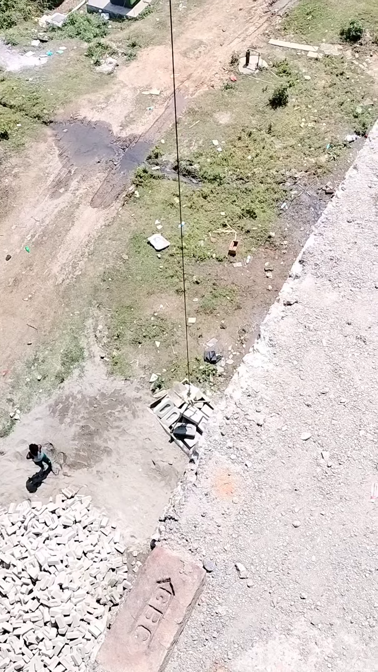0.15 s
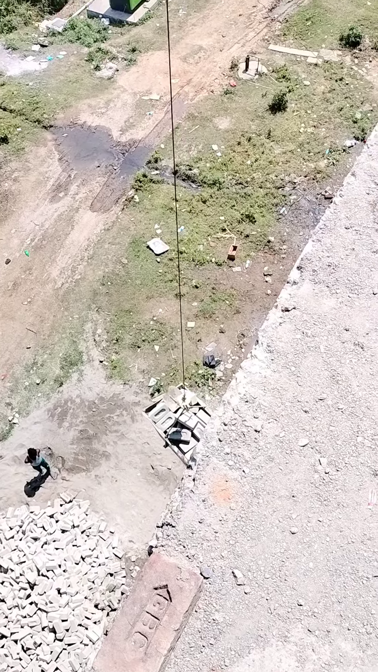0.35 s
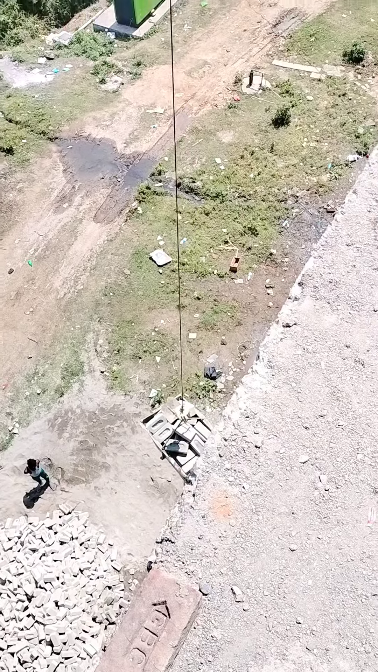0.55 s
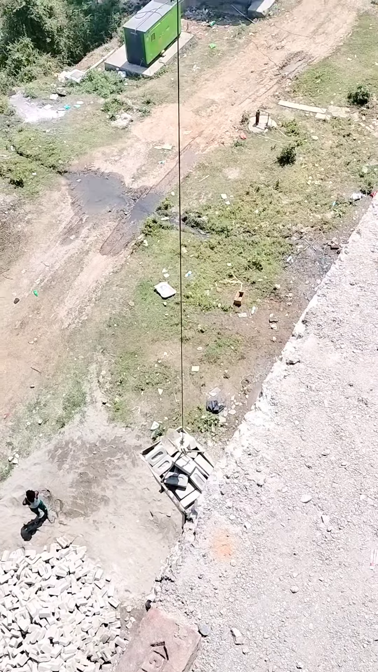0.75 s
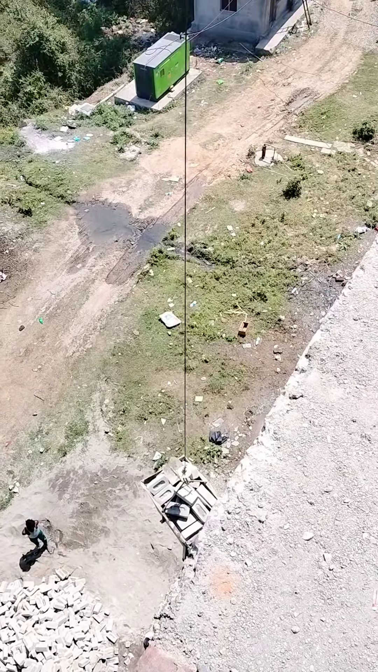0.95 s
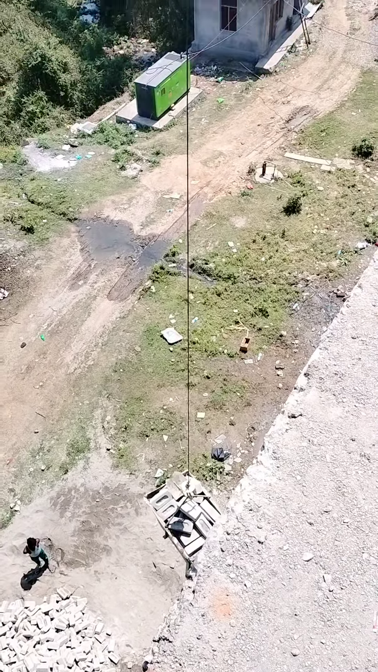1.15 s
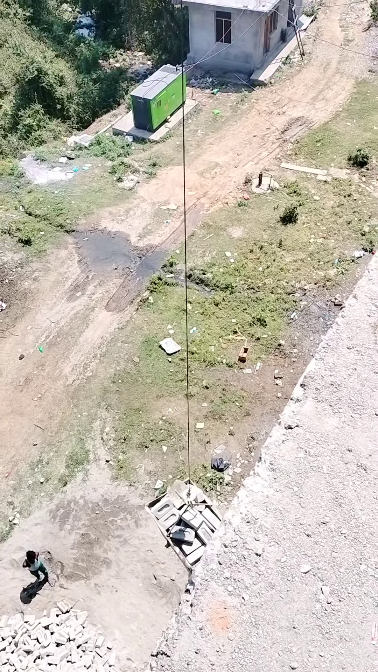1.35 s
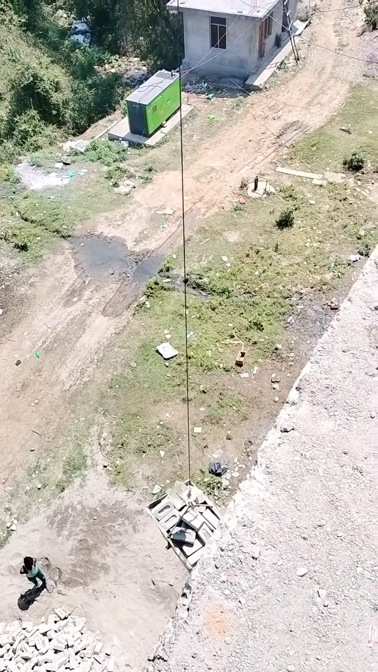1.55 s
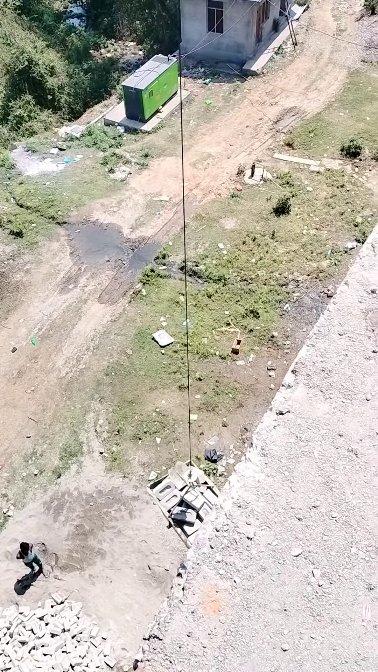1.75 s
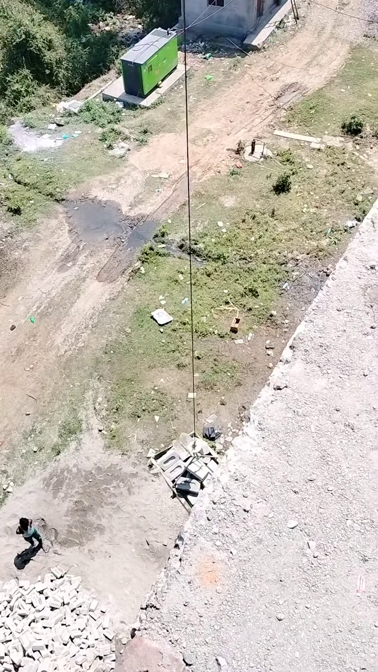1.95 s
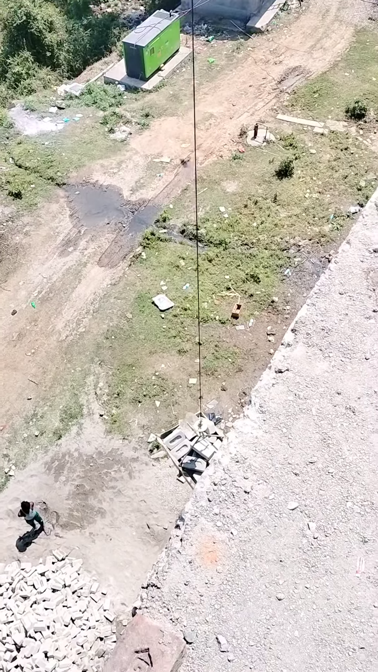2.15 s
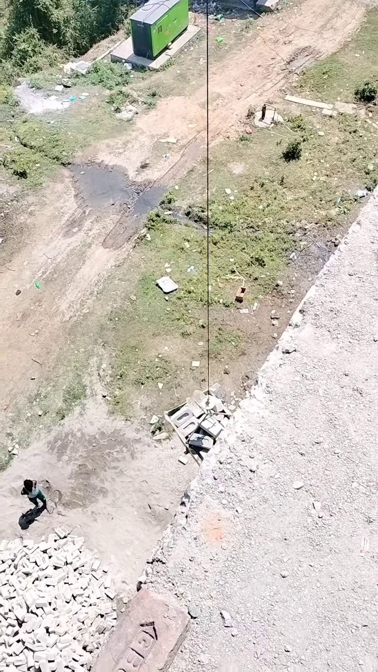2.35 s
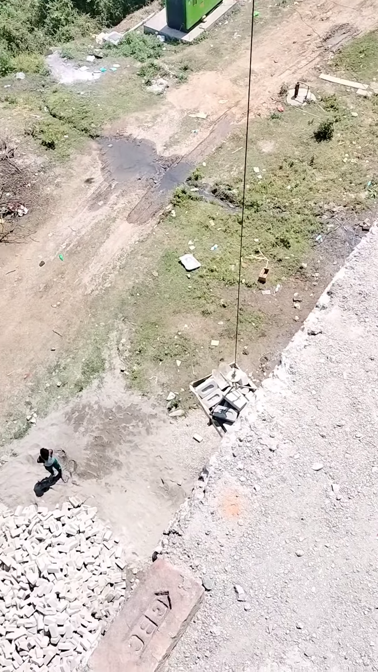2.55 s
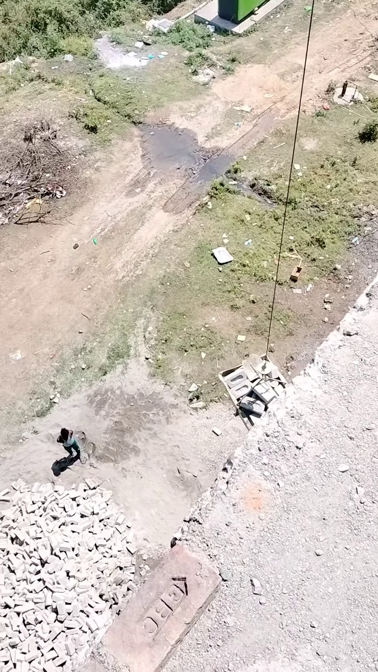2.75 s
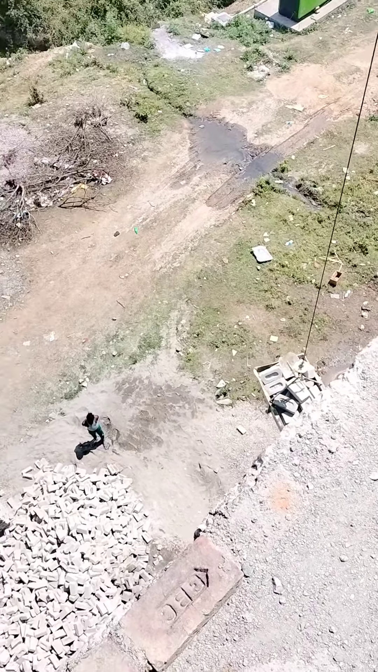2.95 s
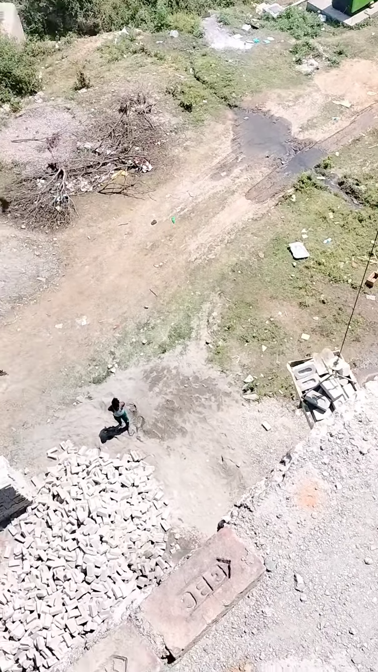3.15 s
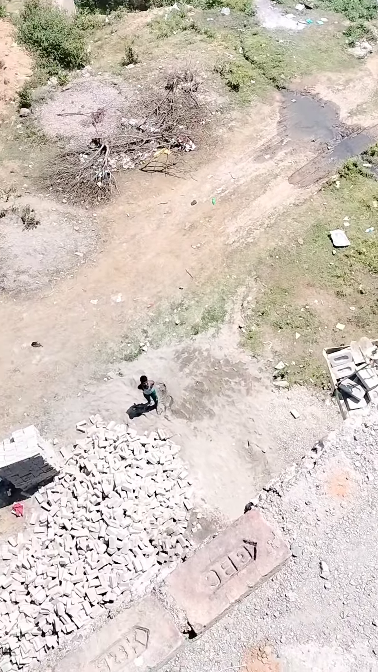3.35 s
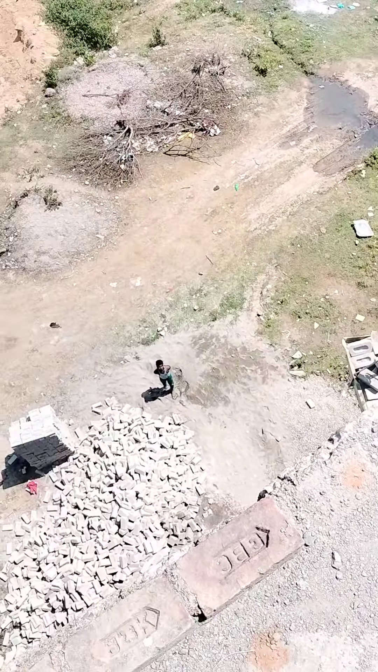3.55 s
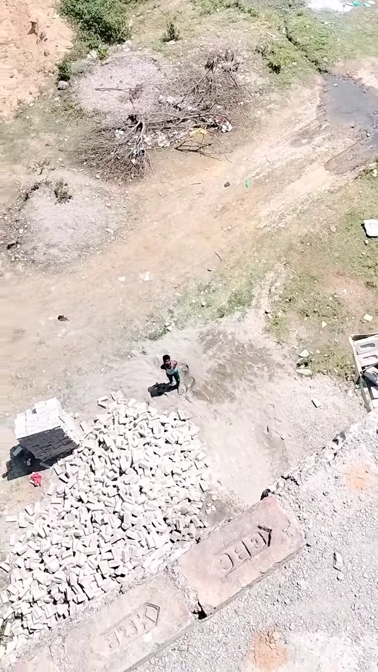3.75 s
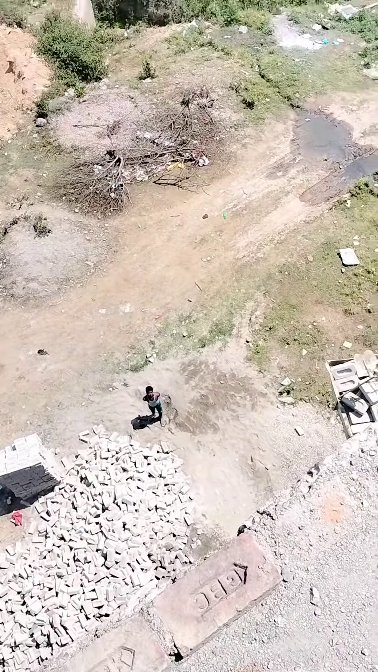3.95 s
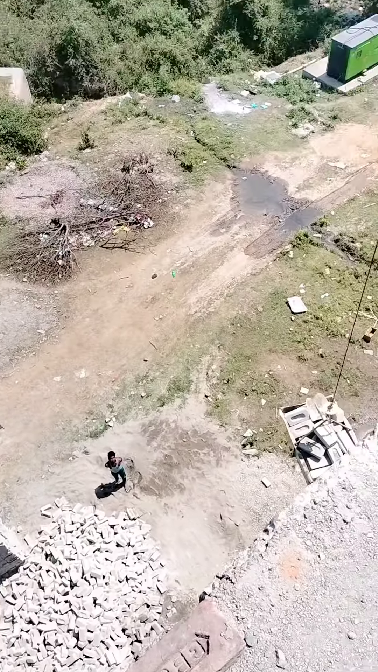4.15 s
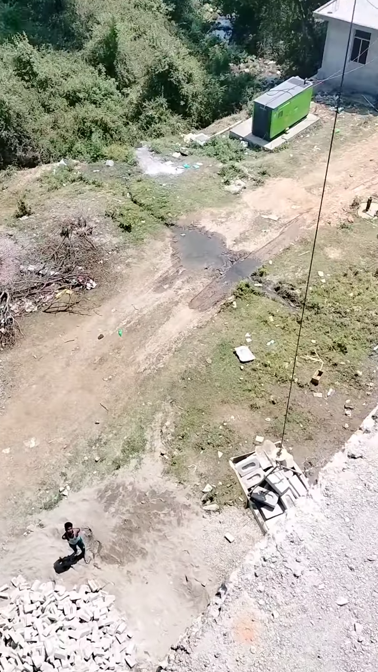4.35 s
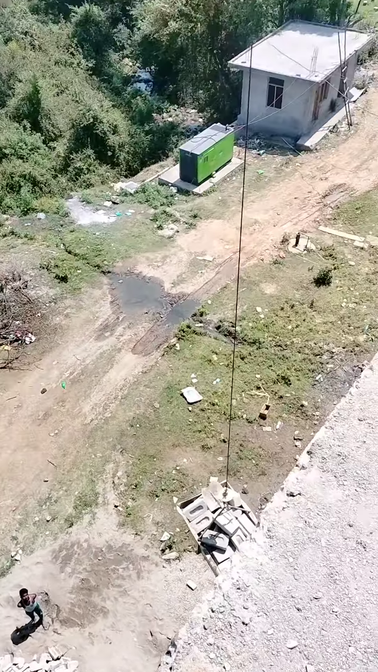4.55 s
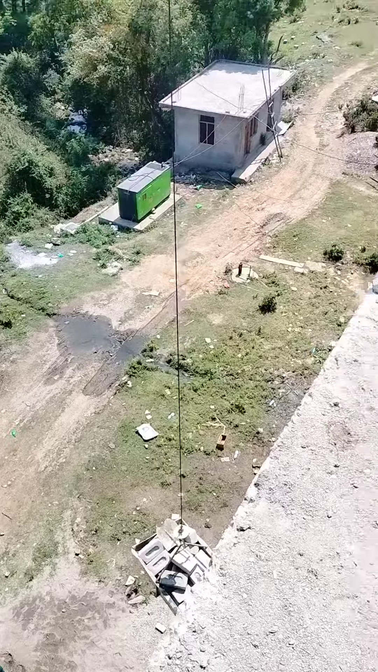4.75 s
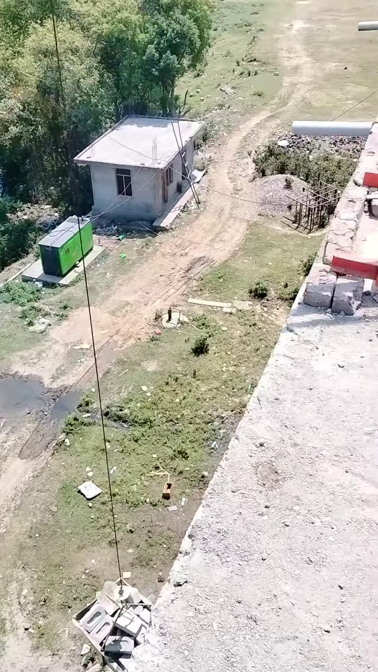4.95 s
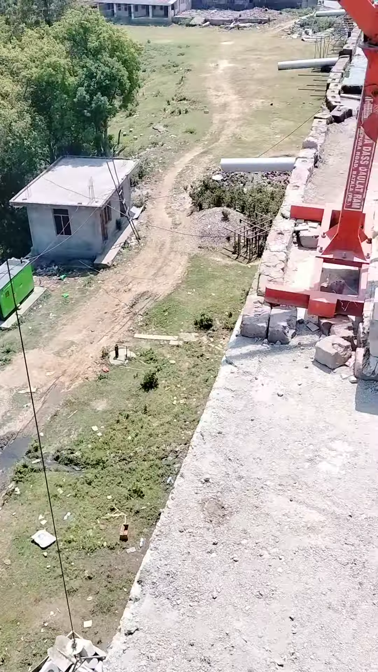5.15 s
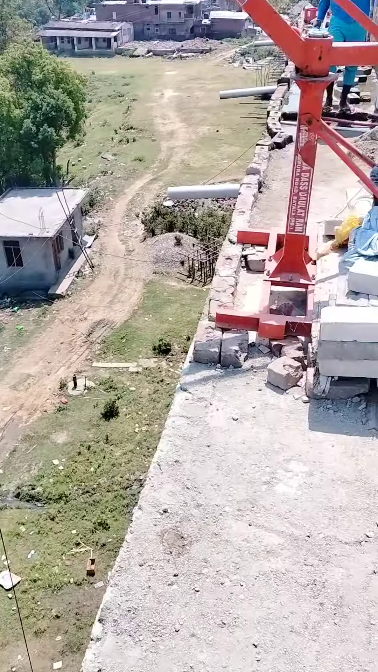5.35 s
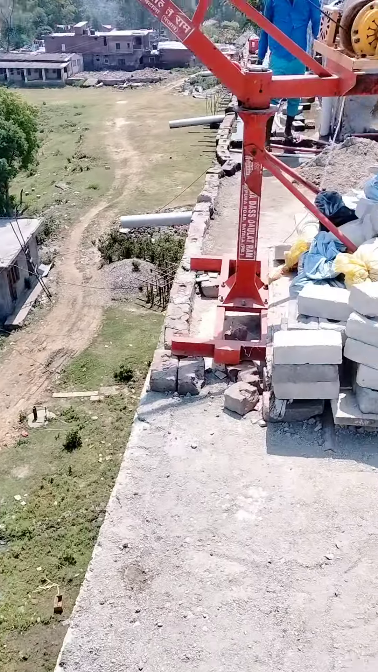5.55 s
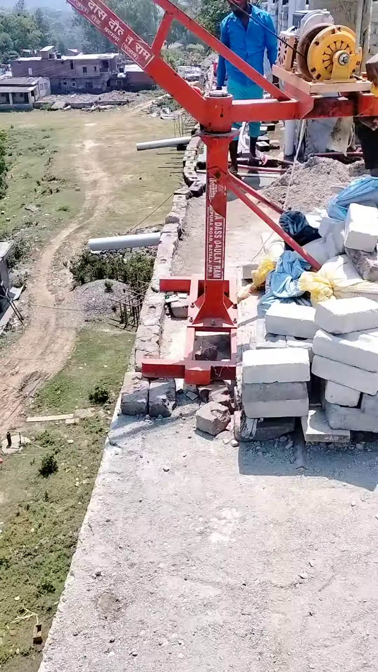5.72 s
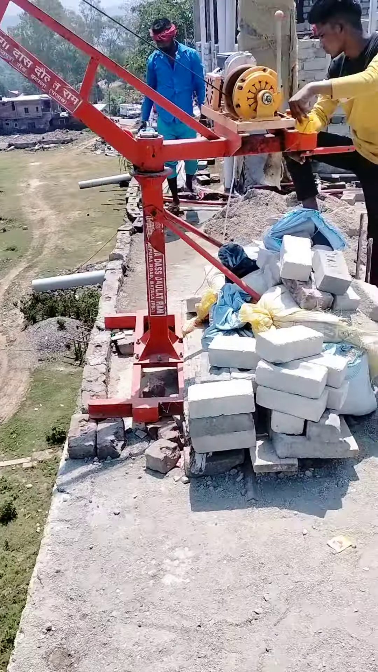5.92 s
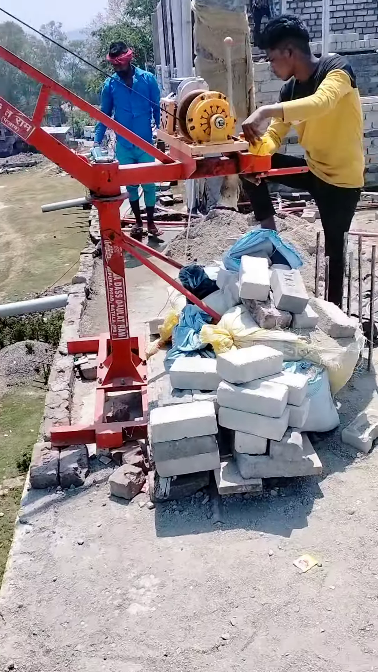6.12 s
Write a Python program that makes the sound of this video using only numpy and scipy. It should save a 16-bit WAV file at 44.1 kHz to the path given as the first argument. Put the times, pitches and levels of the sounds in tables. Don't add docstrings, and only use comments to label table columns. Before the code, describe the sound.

A small electric winch whines and grinds steadily with a throbbing gear pulse, while wind thumps the microphone and stones crunch underfoot near the end.

```python
import sys
import numpy as np
from scipy import signal
from scipy.fft import rfft, irfft, next_fast_len
from scipy.io import wavfile
from scipy.ndimage import uniform_filter1d

SR = 44100
rng = np.random.default_rng(int(sys.argv[2]) if len(sys.argv) > 2 else 0)


def log_audio(samples):
    frames = np.atleast_2d(samples).T
    limited = np.clip(frames, -1, 1)
    pcm = np.round(limited * 32767).astype(np.int16)
    wavfile.write(sys.argv[1], SR, pcm)


def volts_from_db(level):
    exponent = np.asarray(level, float) / 20
    return 10 ** exponent


N = 277124

START_S, FADE_IN_S = .2866, .0006
PINION_TEETH, WHEEL_TEETH, WHEEL_TURN_AT_1S = 7, 83, .049
# time in seconds, shaft turns per second.
SHAFT_SPEED = [(0.28, 48.054), (0.9, 48.006), (1.5, 48.155), (2.1, 48.093), (2.7, 48.004), (3.3, 48.109),
               (3.9, 48.057), (4.5, 48.021), (5.1, 48.017), (5.7, 48.045), (6.28, 48.017)]
RUNOUT = [(0, 0.26, 0.7), (.09, -0.89, 0.39), (.17, -0.93, 1.1), (.26, -0.74, 0.43), (.33, 0.36, 0.59),
          (.42, 0.57, 1.4), (.5, 0.36, 1), (.62, 0.8, 0.92), (.76, 1.1, .85), (.88, 0.64, 1.13),
          (1, 0.26, 0.7)]
OVERTONES = [(0, 0, .4, 3.1, .3, 3.1, .3, 0), (.05, -.4, .6, 2.6, .6, .5, .6, -.8),
             (.15, -1, 1, 2.4, 1.8, -.3, 1.4, -.9), (.25, -.9, .8, 2.7, .7, -1.2, .3, -3.3),
             (.35, -.1, .4, 3.3, .9, -1.1, .5, -3), (.45, .8, .2, -.2, .5, -1.8, .4, -2.7),
             (.55, .9, .7, .6, 1.3, -2.5, .9, -3.6), (.65, 1.4, 1.3, .8, .9, -3, .8, -3.3),
             (.75, 1.7, 2.1, 1.1, .6, -2.6, 1.6, -2.8), (.8, 1.7, 1.6, 1, .7, -1.9, 2.3, -3.2),
             (.9, .9, .7, -.6, 1.3, -2.1, .5, -3.1), (.95, .4, .4, -1.7, 1, -2.5, .6, -1.3),
             (1, 0, .4, -3.18, .3, -3.18, .3, 0)]
MESH_DB = [
    [-39.5],
    [-40.5],
]
SECOND_LEAD = (-1.65, 1.5)
# level in dB, swell in dB, loudest at share of the 83-turn cycle, share of the third's
# left-right sway, dB gained facing the winch, lag of the sway in seconds.
SECOND_LEVEL = (-42, 4, 0.3, 1.1, 2.5, -2)
# time in seconds, left dB, right dB, rad the left leads by.
THIRD = [(0.28, -28, -28, 2.25), (0.6, -26.5, -29.5, 3.25), (0.9, -27.5, -27, 4.17),
         (1.5, -27.5, -28.5, 2.63), (1.8, -29.5, -23, 3.06), (2.1, -31.5, -25.5, 2.8),
         (2.4, -29.5, -32, 3.8), (3.0, -33, -32.5, 4.3), (3.3, -27, -33.0, 4.55), (3.6, -33, -30, 4.37),
         (3.9, -29, -31.5, 4.4), (4.2, -32.5, -30, 3.88), (4.8, -36.5, -27, 4.7), (5.1, -27, -24, 5.7),
         (5.4, -22.5, -23, 6.3), (5.7, -30, -27.5, 5.7), (6.0, -24, -23.5, 7), (6.28, -23.5, -25, 5.6)]
# time in seconds, left dB, right dB.
FOURTH = [(.4, -45, -47.5), (.9, -57, -44.5), (1.15, -38.5, -36), (1.5, -42, -32.5), (1.9, -38, -40),
          (2.2, -55.5, -45), (2.6, -43, -34.5), (2.9, -31, -43.5), (3.2, -32, -38.5), (3.6, -34.5, -47),
          (4.1, -46, -42), (4.5, -47, -34.5), (4.9, -41.5, -30.5), (5.2, -48.5, -41), (5.5, -40.5, -44.5),
          (5.9, -44.5, -48), (6.2, -37, -36.5)]
# start in rad, drift in rad per second, rad gained between swells, first swing in rad,
# settling time in seconds.
FOURTH_LEAD = (.1, .62, 1.9, -7, .45)
SWELL_AT = .8
# time in seconds, left dB, right dB, rad the left leads by.
NINTH = [(.4, -48.5, -47.5, 1.5), (1.1, -46, -48, -0.2), (1.5, -45, -54, 1), (2.2, -49.5, -50, -0.6),
         (2.6, -55.5, -47, -0.2), (3.3, -45, -62, -4), (3.9, -42, -60, -2.5), (4.3, -48.5, -52.5, -3.5),
         (4.7, -51, -49.5, -5.5), (5.2, -44, -54.5, -8), (5.6, -52.5, -51.5, -3.5), (6.2, -43, -48, -4)]
HUM_ORDERS = [2, 8, 15, 16, 18, 19, 24.22, 23.66, 17.65]
# left dB, right dB.
HUM_DB = [(-53.5, -54), (-39, -41), (-53, -52), (-52, -46), (-52, -54.5), (-66, -58), (-64.5, -63),
          (-58.5, -54.5), (-57.5, -56.5)]
SIDE_ORDERS = [20, 22, 23, 25]
SIDE_DB = [-47, -45, -47, -56]
HIGH_ORDERS = [27, 32, 35, 41, 42, 56, 84, 70, 72, 147]
# dB against the grind, share that throbs with the tooth force, left over right in dB.
HIGH = [(-14, .3, .1), (-23, .54, 0.9), (-13.5, 0.37, 0.8), (-18.5, 0.28, -1.4), (-17.5, 0.91, -2.5),
        (-16, .64, 2), (-20, 0.84, 0.3), (-18.5, 0.54, 2.5), (-16.5, 0.3, 3), (-44, .2, -0.5)]
# middle in seconds, length in seconds, level in dB.
BOOM = [
    (1.1, 2.6, -44.5),
    (2.65, 1, -41),
    (3.42, 0.44, -41.5),
    (4.6, 1.3, -39),
    (5.8, 1.1, -37),
]
BOOM_HZ = 229.4
# pitch in Hz, level in dB per Hz.
CASE = [(40, -14), (230, 5.5), (500, 3.5), (680, 6), (820, 1.5), (1020, 14.5), (1250, 6), (1600, -1),
        (3300, -3), (4500, -10), (5900, -19), (6500, -28.5), (7200, -29.5), (8600, -51)]
DIP_DB = -1
GRIND_DB = [
    [-38.6],
    [-37.5],
]
# pitch in Hz, how far the grind follows the tooth force.
THROB = [(400, 0.087), (1500, 0.67), (3000, 1.2), (6000, 1.3)]
# pitch in Hz, likeness of the two microphones from 0 to 1.
ALIKE = [(100, 0.38), (330, 1), (1000, 0.26), (3000, 0.43), (6000, 0.12)]
# pitch in Hz, rad the left leads by.
LEAD_AWAY = [(0, 6.5), (520, -1.55), (950, -1), (3010, -7), (3360, -9.5), (5430, -11.5), (6030, -16),
             (6800, -8)]
# pitch in Hz, rad the left leads by.
LEAD_FACING = [(0, 5.5), (1030, -2), (2670, -2.5), (3360, -2), (4820, -4), (6030, -18), (6550, -11),
               (6800, -3)]
# time in seconds, facing the winch from 0 to 1, gain from coming closer in dB.
TURN = [(0, 0.2, -1.5), (1, 0.24, 0.3), (1.6, 0.27, 2), (2.2, 0.19, -0.14), (4.5, 0.26, 0.7),
        (5.3, 0.6, 2.5), (5.9, .8, 5.5), (6.3, 1., 2.5)]
NEAR_SHARE = [
    [1.1],
    [0.28],
]
# pitch in Hz, change in dB.
HAND_SHADE = [(300, 0), (2500, 1), (4400, -2), (6700, -3)]
# middle in seconds, length in seconds, strength in dB.
GRIP = [
    (3.3, 2, 1.7),
]
# pitch in Hz, change in dB.
CUP = [(1200, 1.3), (1750, 3), (2300, -1.3), (3300, 0.9), (5000, -5)]
SHADE_DB, SHADE_HZ = -11, 555
# pitch in Hz, level in dB per Hz.
WIND_COLOUR = [(15, -39.5), (40, -10), (90, -6), (190, -3), (270, -11.5), (420, -16), (700, -42),
               (1200, -66.5)]
CALM_DB = [
    [-48],
    [-48],
]
# middle in seconds, length in seconds, level in dB, microphone (0 left, 1 right).
GUSTS = [(0.383, 0.2, -26.5, 0), (.48, .25, -33, 1), (0.767, .2, -22, 0), (.72, .14, -29.5, 1),
         (.85, .08, -25, 0), (0.902, .22, -29, 1), (1.0, 0.21, -28, 0), (1.06, .1, -32, 1),
         (1.2, .1, -31, 1), (1.22, 0.36, -34, 0), (1.365, 0.14, -35, 1), (1.43, .12, -23.5, 0),
         (1.57, 0.16, -28, 0), (1.7, 0.087, -36, 1), (1.826, 0.18, -26.5, 0), (2.03, 0.13, -29.5, 0),
         (2.239, 0.15, -28, 0), (2.3, 0.86, -47, 0.93), (2.75, 0.28, -25, 0), (3.5, 1.1, -43, 0),
         (4.02, .23, -27, 1), (4.1, 0.56, -40, 0.021), (4.25, 0.26, -33.5, 1), (4.53, 0.14, -34, 1),
         (4.59, 0.26, -20, 0), (4.76, 0.21, -31.5, 0.0071), (4.938, 0.15, -27, 0),
         (5.102, 0.41, -34.5, 0.033), (5.1, .1, -37, 0.97), (5.6, .8, -44, 0.05)]
# time in seconds, peak in dB, pitch in Hz, microphone (0 left, 1 right),
# direction (1 push, -1 pull).
THUMPS = [(.394, -18, 190, 0, -1.1), (.545, -17, 197, 0, -0.92), (.716, -18, 188, 0.12, -1),
          (.735, -15.5, 175, 0, 1), (.759, -4, 177, 0, -0.93), (.802, -10.5, 170, 0, -1.14),
          (0.819, -14, 165, 0, -1), (.83, -8.5, 205, 0, -1.04), (.928, -17, 200, 1, 0.93),
          (.971, -18, 182, 0.93, -1.1), (1.163, -14.5, 244, 1, 1), (1.267, -16.5, 181, 0.077, -1),
          (1.41, -10.5, 160, 0, -1.06), (1.431, -5.5, 210, 0, -1.1), (1.544, -11, 189, 0, -0.81),
          (1.557, -13, 185, 0, 0.89), (1.615, -15, 134, 0, -0.88), (1.768, -11.5, 192, 0, -1.15),
          (1.783, -17.5, 190, 0, -1), (1.812, -15.5, 190, 0, -0.95), (1.912, -15.5, 196, 0, -1),
          (2.175, -15, 193, 0, 1), (2.196, -18, 190, 0, 0.91), (2.742, -15, 168, 0.078, 0.9),
          (2.767, -14.5, 166, 0, -0.93), (3.968, -18.5, 181, 1, -1), (4.03, -14.5, 166, 1, 0.93),
          (4.074, -17.5, 130, 1, 0.89), (4.13, -19, 190, 1, -0.94), (4.245, -17.5, 146, 1, -0.95),
          (4.312, -15, 136, 1, 0.89), (4.51, -13.5, 203, 0, -0.96), (4.528, -13.5, 182, 0, -0.95),
          (4.557, -8, 213, 0, -1.2), (4.604, -4, 196, 0, 0.91), (4.618, -0.5, 210, 0, -1),
          (4.651, -10, 195, 0, 1), (4.674, -20, 200, 0, -1), (4.808, -9.5, 226, 0.1, 1),
          (4.928, -15, 140, 0, 1)]
# time in seconds, peak in dB, left over right in dB, seconds to fall by 60 dB.
TICKS = [(1.2037, -13.5, -1.5, 0.016), (2.2663, -11.5, -6, 0.017), (2.9024, -19.5, -1.5, 0.028),
         (5.5697, -37, 8, 0.031), (5.6474, -36, -4.5, 0.035), (5.7922, -29, 2.5, 0.021),
         (5.895, -30.5, 8, 0.037), (5.9244, -23, 5.5, 0.027), (5.9942, -32, 1.5, 0.052),
         (6.0312, -15.5, 2, 0.013), (6.1016, -16, 5.5, 0.013)]
KNOCK_S = [1.204, 1.205, 2.35, 5.073, 5.078, 5.79, 5.897, 5.995, 6.108]
# peak in dB, pitch in Hz, width in Hz, seconds to fall by 60 dB.
KNOCKS = [(-20.5, 1300, 300, 0.14), (-21.5, 2500, 510, 0.08), (-24, 1100, 740, 0.049), (-20, 830, 220, 0.1),
          (-18, 270, 330, 0.18), (-24.5, 2000, 570, 0.049), (-17, 1500, 380, 0.071),
          (-17.5, 1200, 900, 0.029), (-21.5, 700, 900, 0.21)]
# pitch in Hz, level in dB per Hz.
SOLE = [(300, -19.5), (550, -2.5), (1500, 4), (2000, -3.5), (2500, -3), (3300, -10), (4700, -9.5),
        (7000, -32), (9000, -55)]
# start in seconds, end in seconds, level in dB.
SCUFFS = [
    (5.788, 5.857, -31),
    (5.897, 5.929, -32.5),
    (5.955, 6.037, -32.5),
    (6.109, 6.11, -38),
]
SCUFF_RISE_DB_PER_S, SCUFF_FALL_DB_PER_S = 259.5, 171
# middle in seconds, length in seconds, pitch in Hz, level in dB.
STONES = [(5.6, .02, 1700, -37), (5.757, 0.0072, 3000, -34), (5.796, 0.013, 2100, -25.5),
          (5.82, .05, 2400, -27), (6.4, .04, 4900, -32.5), (5.85, 0.042, 1900, -36),
          (5.885, .04, 1600, -32.5), (5.918, 0.056, 2550, -24.5), (2.5, 0.07, 3500, -37.5),
          (7.4, .025, 1600, -28.5), (5.973, 0.027, 2600, -28.5), (5.5, 0.079, 4000, -31.5),
          (5.994, 0.023, 1300, -27.5), (4.3, 0.021, 3500, -28.5), (6.04, 0.038, 3200, -26.5),
          (6.04, 0.031, 3900, -30.5), (5.5, .012, 5700, -31), (6.108, 0.034, 2300, -32.5),
          (5.86, .15, 550, -40)]
STONE_WIDTH = .13
# time in seconds, peak in dB, pitch in Hz, left over right in dB.
CRACKS = [(1.2045, -17, 2600, -3.5), (1.2091, -21.5, 2400, -2.5), (1.2145, -23, 1405, -2),
          (2.2682, -27, 5180, 0.5), (5.0745, -14, 788, 0), (5.6, -24, 2025, 3), (5.7558, -22, 2860, 1.5),
          (5.773, -20.5, 2090, 1.5), (5.7876, -21, 2370, 4), (5.7945, -13, 1900, 4.5),
          (5.7957, -12, 2253, 3.5), (5.8091, -15.5, 2475, 5.5), (5.8152, -19.5, 3050, 4),
          (5.8225, -20, 2435, 4), (5.835, -19.5, 2100, 8), (5.845, -23.5, 2464, 1.5),
          (5.8834, -17.5, 1930, 3), (5.9012, -19, 1718, 5.5), (5.9164, -19.5, 3170, 3),
          (5.9277, -15.5, 2480, 4), (5.9538, -21.5, 1935, 4), (5.9615, -16.5, 2430, 3),
          (5.9905, -17.5, 1917, 2), (5.9969, -13, 1760, 4), (6.0305, -18, 3250, 1.5),
          (6.1055, -18, 2400, 0)]
CRACK_CYCLES, CRACK_EDGE_DB = 2.2, -8
# start in seconds, length in seconds, top pitch in Hz, level in dB.
CAWS = [
    (1.671, 0.33, 1883, -41.5),
    (2.48, .29, 1850, -39),
    (3.28, .28, 1960, -37.5),
]
CAW_ARCH, CAW_ROUGH = .14, .7
CAW_BEAT_HZ = 126.7
CAW_BEATS = [-9, -12, -3.5]
# delay in seconds, level in dB.
CAW_ECHOES = [
    (0, 0),
    (.035, -6),
    (.12, -8),
]
GATES_HZ = np.arange(5850, 8700, 170)
KEEP_DB = -87


def evened(x):
    return x / np.sqrt(np.mean(abs(x) ** 2) + 1e-20)


def read(points, hz):
    f, value = np.transpose(points)
    return np.interp(np.log(hz + 1), np.log(f + 1), value)


def play(rows, t=None):
    s, *columns = np.transpose(rows)
    at = np.arange(N) / SR if t is None else t
    return np.array([np.interp(at, s, column) for column in columns])


def add(mix, s, sound):
    part = mix[..., round(s * SR):][..., :sound.shape[-1]]
    part += sound[..., :part.shape[-1]]


def colour(x, points):
    size = next_fast_len(N, True)
    gain = volts_from_db(read(points, np.fft.rfftfreq(size, 1 / SR)))
    return evened(irfft(rfft(x, size) * gain, size)[..., :N])


def flutter(width_hz):
    keep = np.exp(-np.pi * width_hz * 32 / SR)
    step = np.arange(N // 32 + 2) * 32
    a, b = signal.lfilter([1], [1, -keep], rng.standard_normal((2, len(step))))
    return np.interp(np.arange(N), step, evened(a + 1j * b))


def steadied(x):
    return x / np.sqrt(abs(uniform_filter1d(x ** 2, size=SR // 10)) + 1e-6)


def swells(rows, t=None):
    step = np.arange(0, N + 128, 128) / SR
    power = sum(volts_from_db(2 * db) * np.exp(-8 * ((step - s) / length) ** 2) for s, length, db in rows)
    return np.interp(np.arange(N) / SR if t is None else t, step, np.sqrt(power))


def noise_band(low_hz, high_hz, order):
    return signal.butter(order, [low_hz, high_hz], "band", fs=SR, output="sos")


def gears():
    shaft = np.cumsum(play(SHAFT_SPEED)[0]) / SR
    wheel = (shaft - shaft[SR]) * PINION_TEETH / WHEEL_TEETH + WHEEL_TURN_AT_1S
    return shaft, wheel % 1


def tone(shaft, order, lead, rough, width_hz, slip=0):
    angle = 2 * np.pi * ((order * shaft + rng.random()) % 1) + slip
    waver = 1 + rough * flutter(width_hz)
    ports = np.array([angle + lead, angle], np.float32)
    return np.sqrt(2 / (1 + rough ** 2)) * (waver.real * np.cos(ports) - waver.imag * np.sin(ports))


def turned():
    facing = play(TURN)[0]
    return (facing - facing[0]) / (1 - facing[0])


def second_lead():
    return SECOND_LEAD[0] + SECOND_LEAD[1] * np.minimum(2 * turned(), 1)


def mesh_whine(shaft, wheel, strength):
    first, second, slip_2, fourth, slip_4, high, slip_high = play(OVERTONES, wheel)
    third, ninth, t = play(THIRD), play(NINTH), np.arange(N) / SR
    out = volts_from_db(MESH_DB) * evened(first) * tone(shaft, PINION_TEETH, -.15, rough=0.28, width_hz=4.3)

    mean_db, swell_db, loudest, sway, facing_db, lag_s = SECOND_LEVEL
    lean_db = uniform_filter1d(np.roll(third[0] - third[1], round(lag_s * SR)), size=SR // 3)
    db = mean_db + swell_db * np.cos(2 * np.pi * (shaft / WHEEL_TEETH - loudest))
    db = db + sway * lean_db * [[.5], [-.5]] + facing_db * turned()
    whine = tone(shaft, 2 * PINION_TEETH, second_lead(), rough=.7, width_hz=30, slip=slip_2)
    out += volts_from_db(db) * evened(.6 + second) * whine

    whine = tone(shaft, 3 * PINION_TEETH, third[2], rough=.15, width_hz=30)
    out += volts_from_db(third[:2] + .3) * evened(strength) * whine

    start, drift, between, swing, settle_s = FOURTH_LEAD
    lead_4 = start + drift * t + swing * np.exp(-(t - START_S) / settle_s)
    lead_4 += between * np.sin(np.pi * (shaft / WHEEL_TEETH - SWELL_AT)) ** 2
    whine = tone(shaft, 4 * PINION_TEETH, lead_4, rough=0.64, width_hz=25, slip=slip_4)
    out += volts_from_db(play(FOURTH)) * evened(fourth) * whine

    whine = tone(shaft, 9 * PINION_TEETH, ninth[2], rough=.35, width_hz=22, slip=slip_high)
    return out + volts_from_db(ninth[:2]) * evened(0.83 + high) * whine


def motor_hum(shaft):
    out, lead, third = np.zeros((2, N)), second_lead(), play(THIRD)
    for order, (left_db, right_db) in zip(HUM_ORDERS, HUM_DB):
        hum = tone(shaft, order, lead * (order > 10), rough=0.2, width_hz=7.4)
        out += volts_from_db([[left_db], [right_db]]) * hum
    for order, db in zip(SIDE_ORDERS, SIDE_DB):
        lean_db = .5 * (third[:2] - third[:2].mean())
        out += volts_from_db(db + lean_db) * tone(shaft, order, lead - .4, rough=.35, width_hz=12)
    return out


def high_whine(shaft, wheel, force):
    out, facing, grind_db = np.zeros((2, N)), play(TURN)[0], grind_level()
    slip_high = play(OVERTONES, wheel)[-1]
    for order, (db, share, pan_db) in zip(HIGH_ORDERS, HIGH):
        hz, drift = order * SHAFT_SPEED[0][1], flutter(0.41)
        lead = (1 - facing) * read(LEAD_AWAY, hz) + facing * read(LEAD_FACING, hz) + .7 * drift.real
        lean = volts_from_db((2.2 * drift.imag + pan_db / 2) * [[1], [-1]])
        throb = evened(1 - share + share * force ** 2) * lean
        slip = slip_high * (order % PINION_TEETH == 0)
        out += volts_from_db(db + grind_db) * throb * tone(shaft, order, lead, rough=.5 * share, width_hz=30, slip=slip)
    return out


def boom_hum():
    sway = np.exp(2j * np.pi * BOOM_HZ * np.arange(N) / SR) * (.7 + flutter(19))
    return swells(BOOM) * sway.real


def grind_level():
    return GRIND_DB + NEAR_SHARE * play(TURN)[1]


def grind(force):
    frames, hz = N // 128 + 5, np.fft.rfftfreq(512, 1 / SR)
    t = np.arange(frames) * 128 / SR
    a, b, c, d, patches = rng.standard_normal((frames, 257, 5)).T
    patches = uniform_filter1d(uniform_filter1d(patches, size=5, axis=0), size=30, axis=1)
    patches = evened(patches)
    press_db = 6.0 * (np.interp(t * SR, np.arange(N), abs(force)) - .6)
    facing = play(TURN, t)[0]
    lead = (1 - facing) * read(LEAD_AWAY, hz)[:, None] + facing * read(LEAD_FACING, hz)[:, None]
    same, right = np.clip(read(ALIKE, hz), 0, 1)[:, None], a + 1j * b
    left = same * right * np.exp(1j * lead) + np.sqrt(1 - same ** 2) * (c + 1j * d)
    z = np.array([left, right])
    z[0] *= volts_from_db(read(HAND_SHADE, hz)[:, None] + read(CUP, hz)[:, None] * swells(GRIP, t))
    z[1] *= volts_from_db(SHADE_DB * np.exp(-((hz[:, None] - SHADE_HZ) / 130) ** 2) * (1 - facing))
    shape = volts_from_db(read(CASE, hz) - 51 * (hz > CASE[-1][0] + 500))
    z *= shape[:, None] * volts_from_db(read(THROB, hz)[:, None] * press_db + 1.3 * patches)
    z *= volts_from_db(DIP_DB * np.exp(-((hz - 1800) / 450) ** 2))[:, None]
    high = hz > 1500
    treble = np.sqrt(np.mean(abs(z[:, high]) ** 2) * np.mean(high) / np.mean(abs(z) ** 2))
    scrape = evened(signal.istft(z, nperseg=512, noverlap=384)[1][:, :N])
    return volts_from_db(grind_level() - 2.0) * scrape / treble


def winch():
    shaft, wheel = gears()
    force, strength = play(RUNOUT, wheel)
    tones = mesh_whine(shaft, wheel, strength) + motor_hum(shaft) + high_whine(shaft, wheel, force)
    return tones + boom_hum() + grind(force)


def scuff():
    clumps = 1.7 * volts_from_db(1.5 * flutter(60).real) * rng.standard_normal((2, N))
    rub = colour(crunch(per_s=260) + clumps, SOLE)
    t, drag = np.arange(N) / SR, 0
    for start, end, db in SCUFFS:
        outside_db = np.maximum(SCUFF_RISE_DB_PER_S * (start - t), SCUFF_FALL_DB_PER_S * (t - end))
        drag = drag + volts_from_db(db - np.maximum(outside_db, 0))
    return rub * drag * volts_from_db([[1.1], [-3.0]])


def crunch(per_s):
    out, t = np.zeros((2, SR)), np.arange(300) / SR
    for hz in np.geomspace(900, 7000, 14):
        size = volts_from_db(3.5 * np.minimum(rng.exponential(1, SR), 3.5)) * (rng.random(SR) < per_s / SR)
        ring = signal.oaconvolve(size, np.sin(2 * np.pi * hz * t) * np.exp(-t * hz / 2.2) * hz)[:SR]
        out += [ring, np.roll(ring, rng.integers(0, 30))]
    return np.tile(evened(out), 7)[:, :N]


def stones():
    out = np.zeros((2, N))
    for s, length, hz, db in STONES:
        t = np.arange(-length, length, 1 / SR)
        band = noise_band(hz * (1 - STONE_WIDTH), hz * (1 + STONE_WIDTH), 2)
        ring = signal.sosfiltfilt(band, rng.standard_normal((2, 7 * SR // 20)))[:, :len(t)]
        level = volts_from_db(db - 5.0) * volts_from_db([[1.5], [-1.5]])
        add(out, s - length, level * evened(ring) * np.exp(-8 * (t / length) ** 2))
    return out


def cracks():
    out, t = np.zeros((2, N)), np.arange(600) / SR
    for (s, db, hz, pan_db), (spread, lag) in zip(CRACKS, rng.random((len(CRACKS), 2))):
        turns = hz * t
        edge = np.exp(-turns / 2) * np.sin(2 * np.pi * turns * (1.4 + 0.78 * spread))
        ring = np.sin(2 * np.pi * turns) + volts_from_db(CRACK_EDGE_DB) * edge
        snap = 1.5 * (1 - np.exp(-turns / .4)) * np.exp(-turns / CRACK_CYCLES) * ring
        add(out[0], s - 1 / hz, volts_from_db(db + pan_db / 2) * snap)
        add(out[1], s - 1 / hz - lag * .0002, volts_from_db(db - pan_db / 2) * snap)
    return signal.sosfilt(signal.butter(4, 5000, fs=SR, output="sos"), out)


def grit():
    out, t = np.zeros((2, N)), np.arange(9000) / SR
    for s, db, pan_db, t60 in TICKS:
        tick = evened(signal.sosfilt(noise_band(1590, 5000, 3), rng.standard_normal((2, 9000))))
        lean_db = np.array([[pan_db / 2], [-pan_db / 2]])
        add(out, s, tick * (1 - np.exp(-t / .0006)) * volts_from_db(db - 15.5 - 60 * t / t60 + lean_db))
    for s, (db, hz, width_hz, t60) in zip(KNOCK_S, KNOCKS):
        band = noise_band(hz - width_hz / 2, hz + width_hz / 2, 2)
        knock = evened(signal.sosfilt(band, rng.standard_normal(9000)))
        add(out, s, knock * volts_from_db(db - 5.5 - 60 * t / t60) * (1 - np.exp(-t / 0.0014)))
    return out


def wind():
    lumps = [volts_from_db(3.5 * np.clip(flutter(40).real, -2, 1.3)) for _ in range(2)]
    gusts = [swells([row[:3] for row in GUSTS if row[3] == port]) for port in range(2)]
    rumble = np.array([colour(lump * rng.standard_normal(N), WIND_COLOUR) for lump in lumps])
    return np.hypot(volts_from_db(CALM_DB), gusts) * steadied(rumble)


def wind_thumps():
    out, t = np.zeros((2, N)), np.arange(-600, 600) / SR
    for (s, db, hz, port, way), phase in zip(THUMPS, rng.random((len(THUMPS), 1))):
        bell = np.exp(-(t * hz / 0.73) ** 2)
        push = bell * np.cos(2 * np.pi * (hz * t + 0.22 * (phase - .5)))
        push += volts_from_db(-11 + 0.13 * db) * bell ** 3 * np.cos(2 * np.pi * 2.43 * hz * t)
        add(out[int(port)], s - 600 / SR, way * volts_from_db(db + 1.5) * push)
    return out


def crow():
    out, rasp = np.zeros((2, N)), np.array([evened(1 + CAW_ROUGH * flutter(120)) for _ in range(2)])
    for s, length, top_hz, db in CAWS:
        arch = np.sin(np.pi * np.arange(0, 1, 1 / (length * SR)) ** .75)
        voice = np.exp(2j * np.pi * np.cumsum(top_hz * (1 - CAW_ARCH * (1 - arch))) / SR)
        beat = np.exp(-2j * np.pi * CAW_BEAT_HZ * np.arange(len(arch)) / SR)
        voice = voice * (1 + sum(volts_from_db(line_db) * beat ** (k + 1) for k, line_db in enumerate(CAW_BEATS)))
        shake = rasp[:, round(s * SR):][:, :len(arch)]
        caw = volts_from_db(db) * np.sqrt(abs(arch)) * (voice * shake).real
        add(out, s, caw * [[-1], [1]])
    return sum(volts_from_db(db) * np.roll(out, round(delay * SR), axis=1) for delay, db in CAW_ECHOES)


def scene():
    foot = scuff() + stones() + cracks()
    return winch() + foot + grit() + wind() + wind_thumps() + crow()


def band_limit(x):
    return signal.sosfilt(signal.butter(12, 8000, fs=SR, output="sos"), x)


def record(dry):
    hz, t, z = signal.stft(dry, SR, nperseg=1024, noverlap=512)
    for low_hz, high_hz in zip(GATES_HZ, GATES_HZ[1:]):
        band = (hz >= low_hz) & (hz < high_hz)
        power = np.mean(abs(z[:, band]) ** 2, axis=1, keepdims=True)
        power_db = 10 * np.log10(abs(uniform_filter1d(power, size=3, axis=2)) + 1e-20)
        whim_db = 2.3 * evened(uniform_filter1d(rng.standard_normal(power.shape), size=12, axis=2))
        z[:, band] /= 1 + volts_from_db(6 * np.clip(KEEP_DB + whim_db - power_db, -9, 9))
    z = z * (hz < GATES_HZ[-1])[:, None]
    gated = signal.istft(z, SR, nperseg=1024, noverlap=512)[1][:, :N]
    fade_in = np.clip((np.arange(N) / SR - START_S) / FADE_IN_S, 0, 1)
    return band_limit(1.2 * np.tanh(gated / 1.2) * fade_in)


dry = scene()
out = record(dry)
log_audio(out)
```